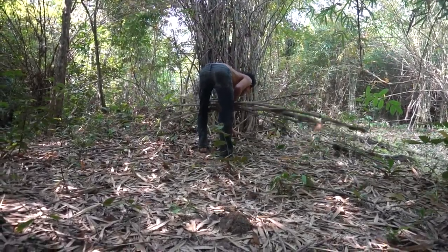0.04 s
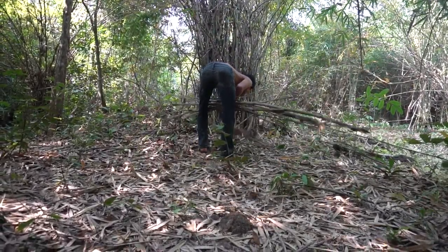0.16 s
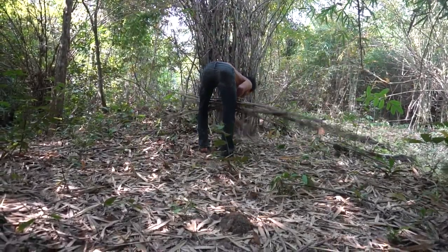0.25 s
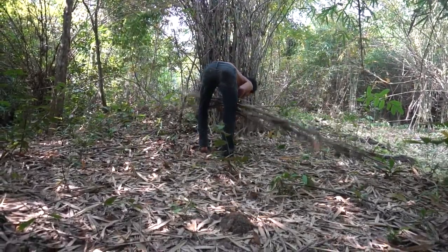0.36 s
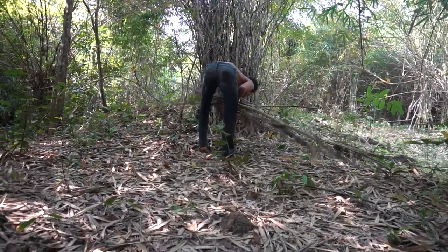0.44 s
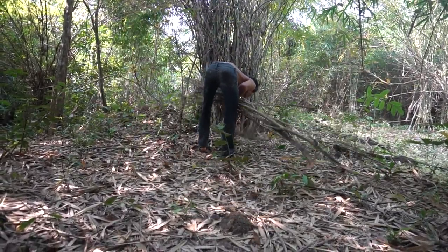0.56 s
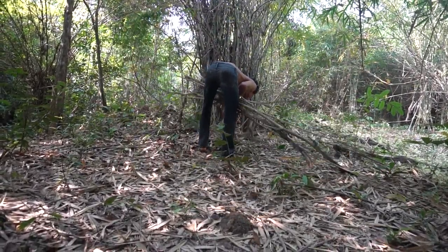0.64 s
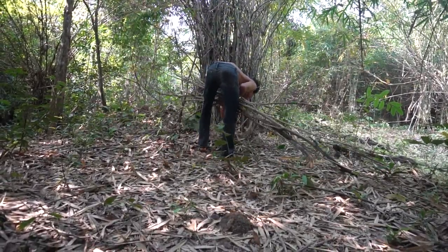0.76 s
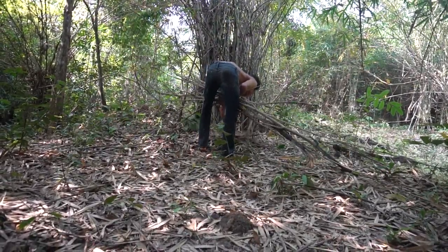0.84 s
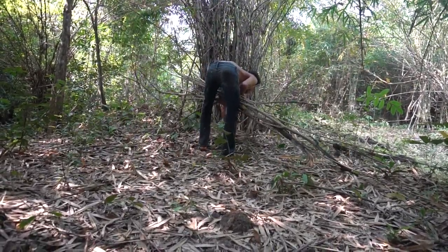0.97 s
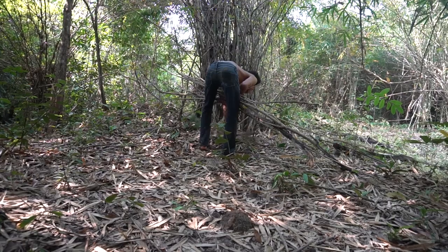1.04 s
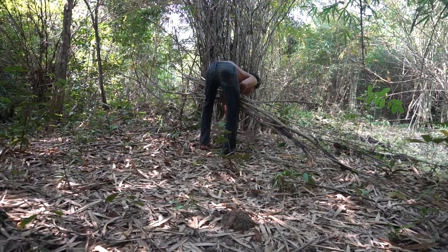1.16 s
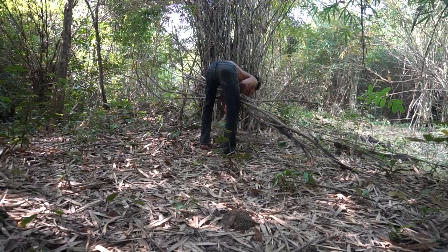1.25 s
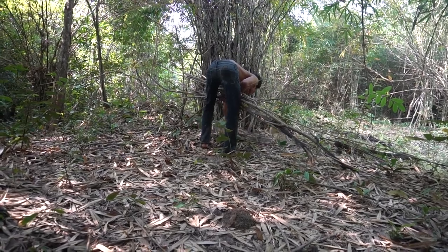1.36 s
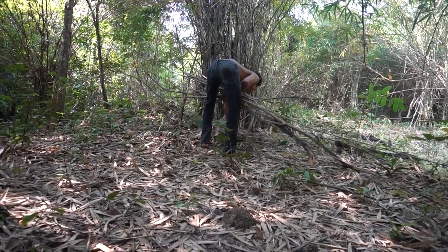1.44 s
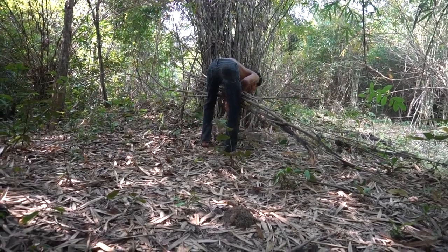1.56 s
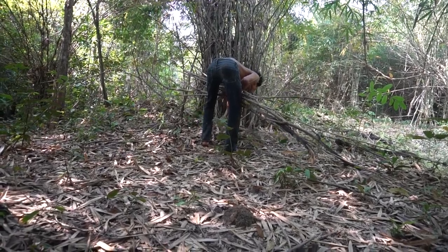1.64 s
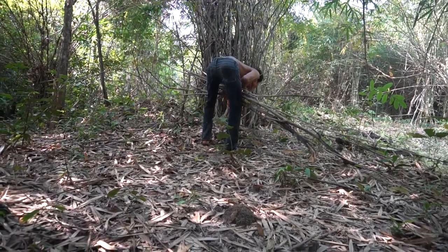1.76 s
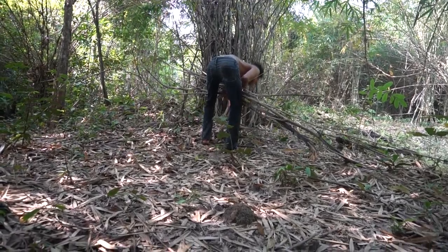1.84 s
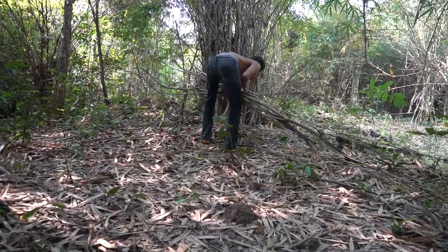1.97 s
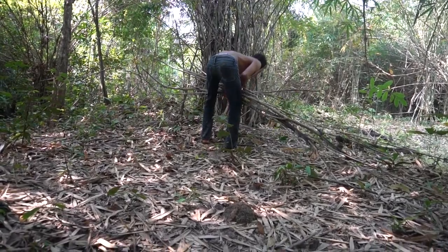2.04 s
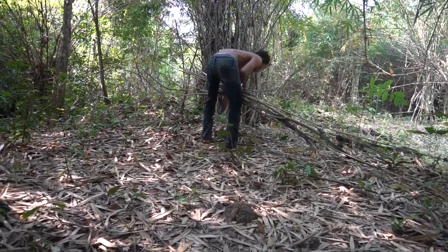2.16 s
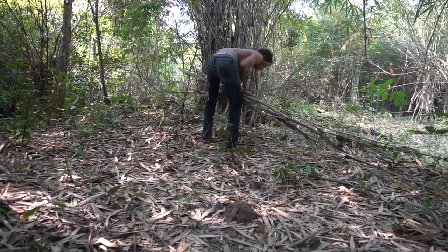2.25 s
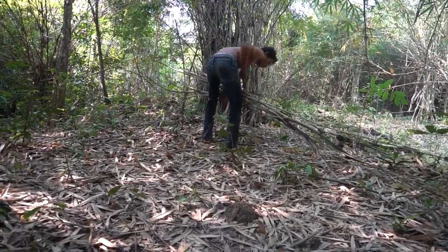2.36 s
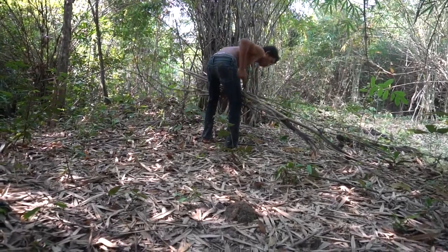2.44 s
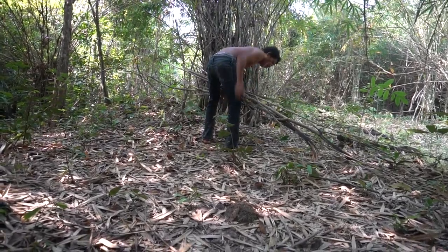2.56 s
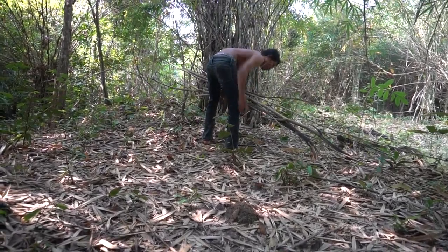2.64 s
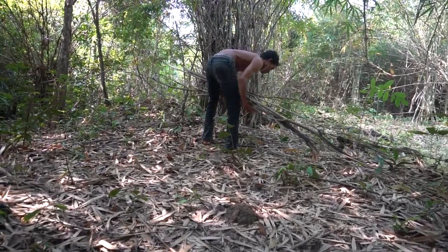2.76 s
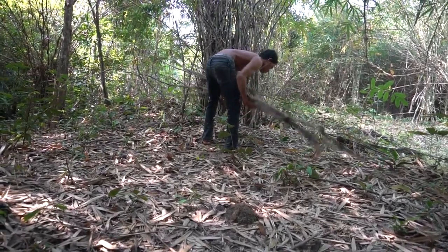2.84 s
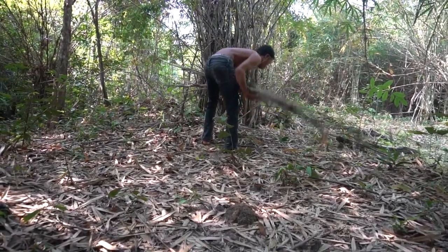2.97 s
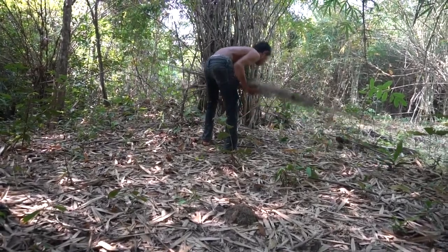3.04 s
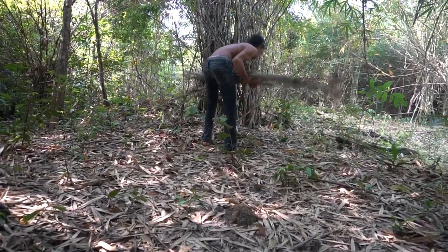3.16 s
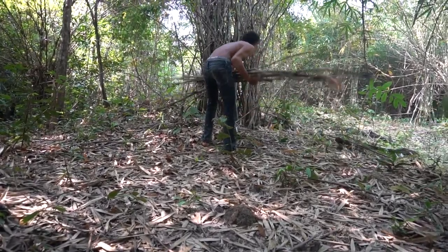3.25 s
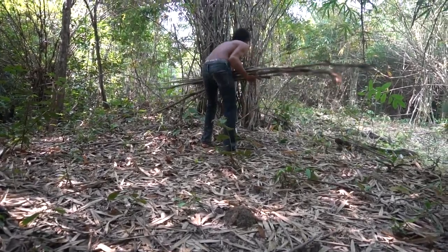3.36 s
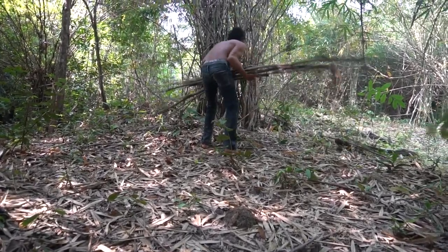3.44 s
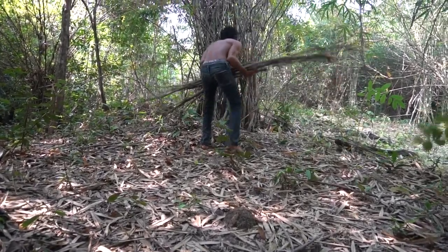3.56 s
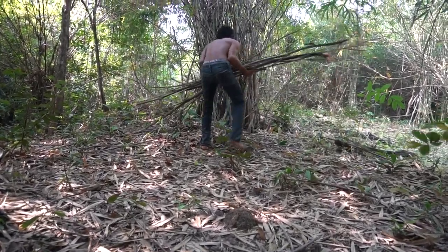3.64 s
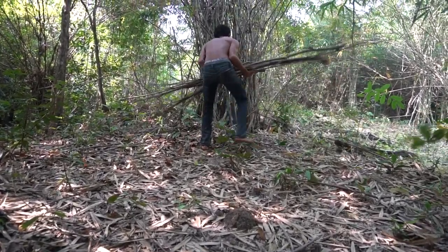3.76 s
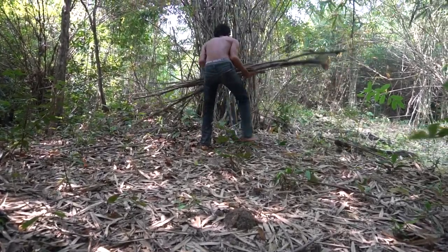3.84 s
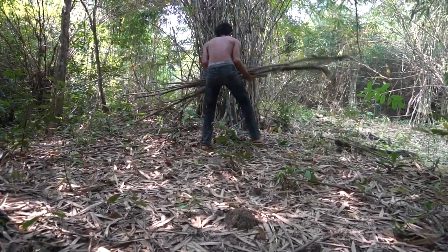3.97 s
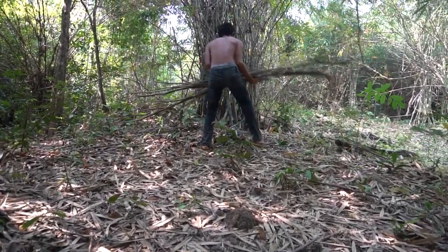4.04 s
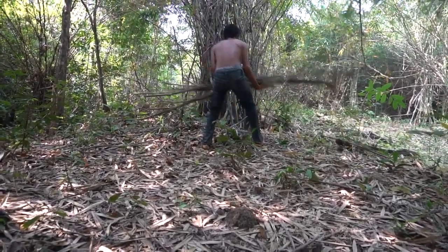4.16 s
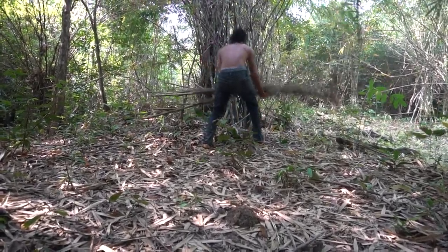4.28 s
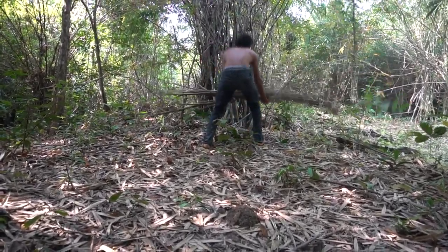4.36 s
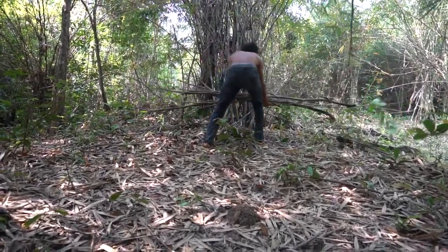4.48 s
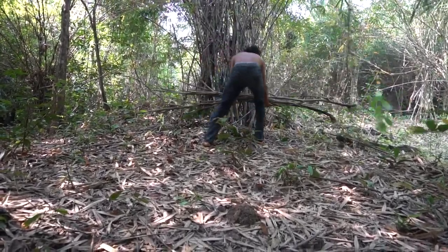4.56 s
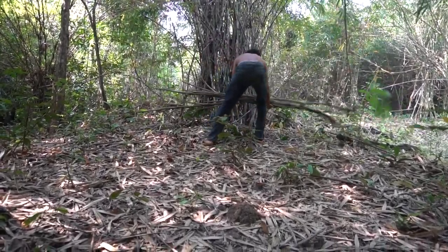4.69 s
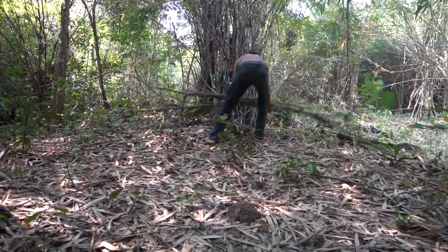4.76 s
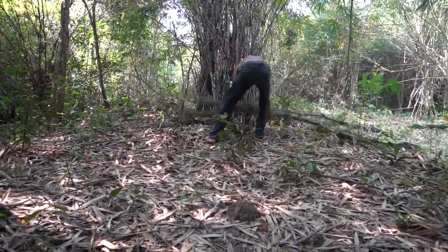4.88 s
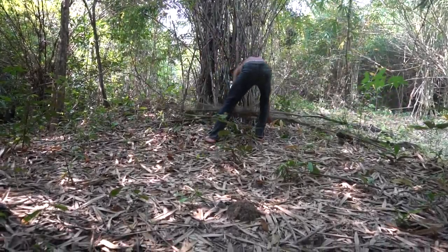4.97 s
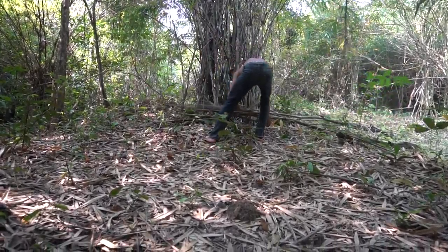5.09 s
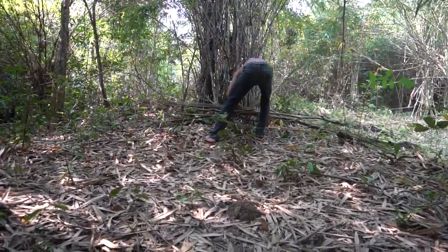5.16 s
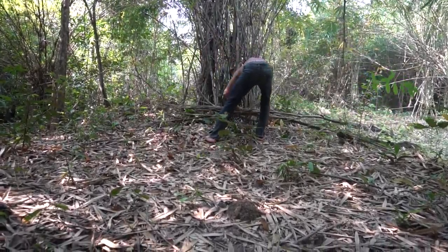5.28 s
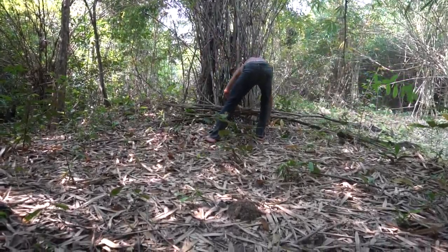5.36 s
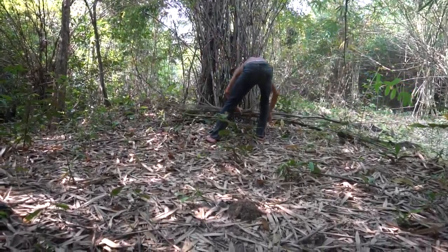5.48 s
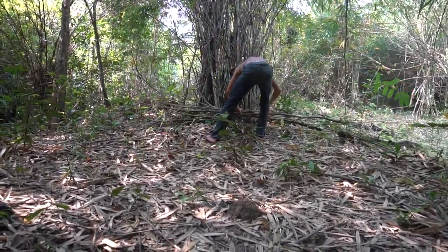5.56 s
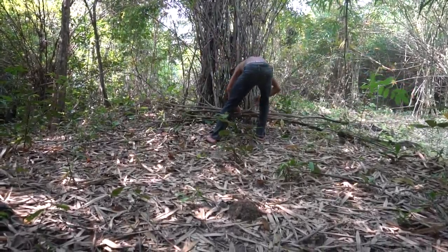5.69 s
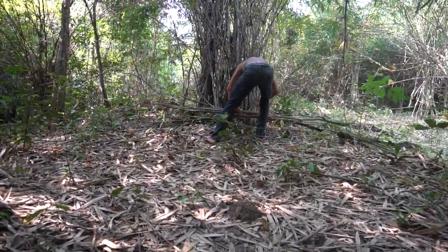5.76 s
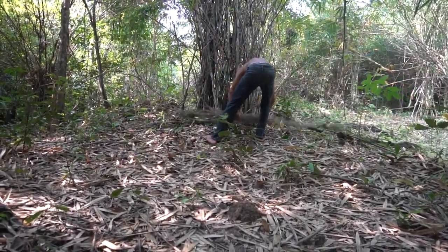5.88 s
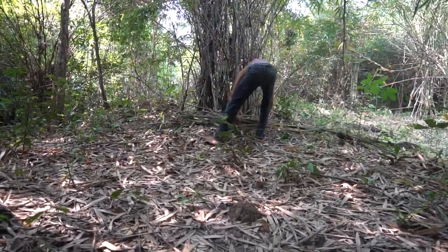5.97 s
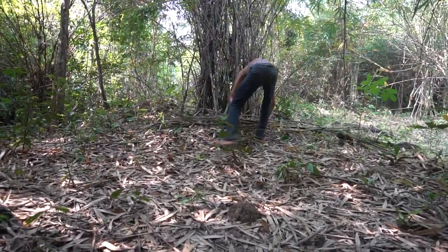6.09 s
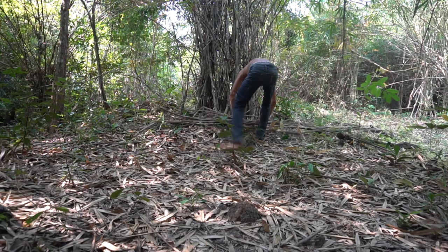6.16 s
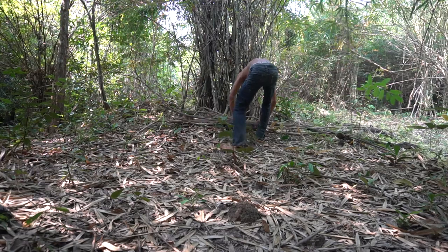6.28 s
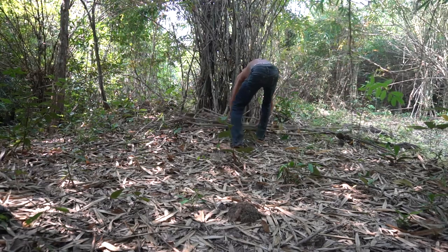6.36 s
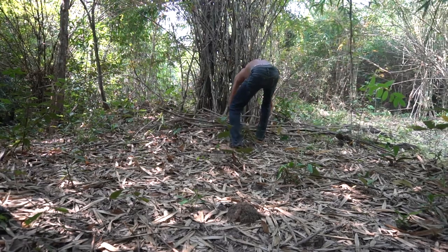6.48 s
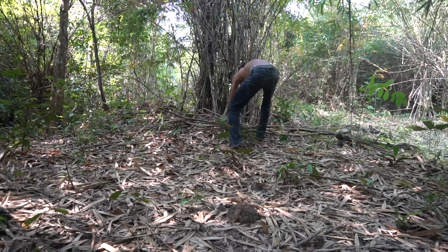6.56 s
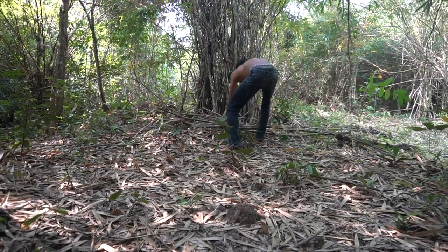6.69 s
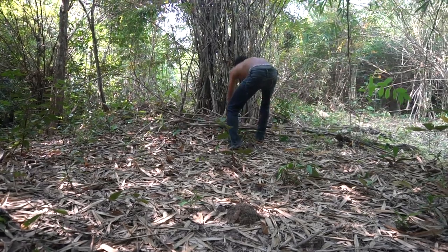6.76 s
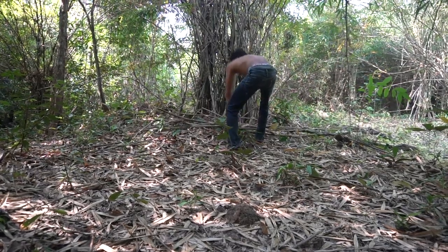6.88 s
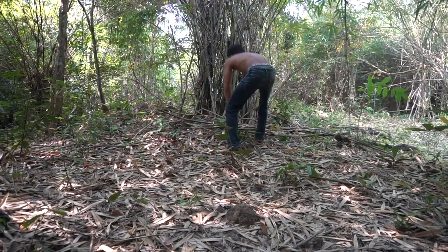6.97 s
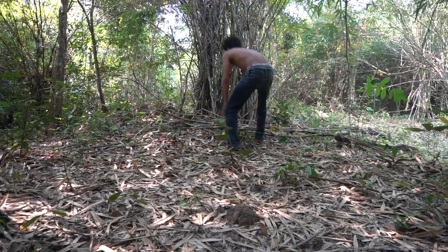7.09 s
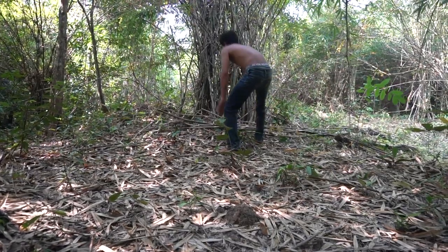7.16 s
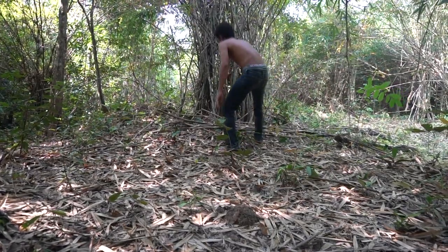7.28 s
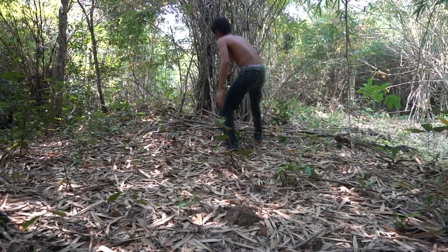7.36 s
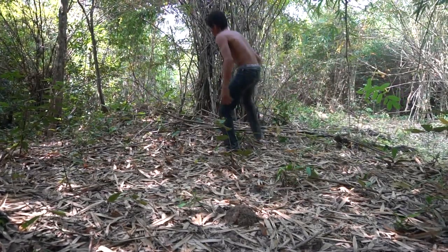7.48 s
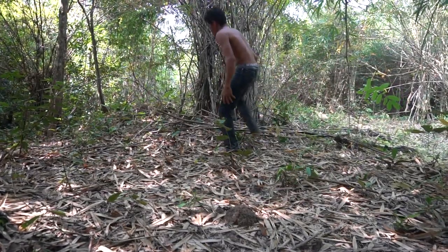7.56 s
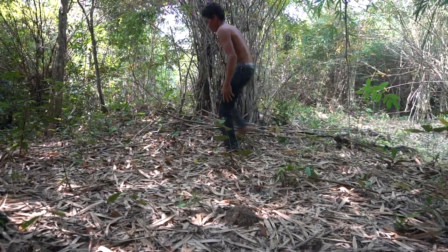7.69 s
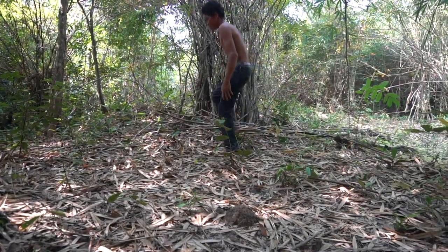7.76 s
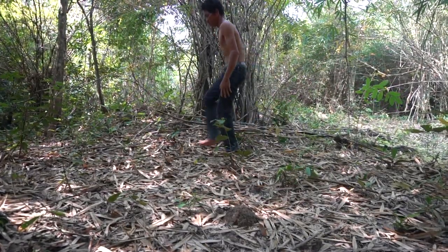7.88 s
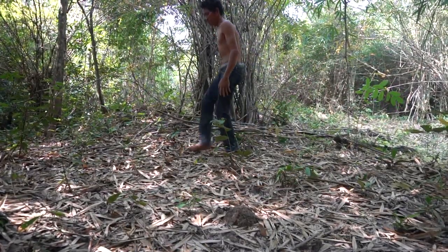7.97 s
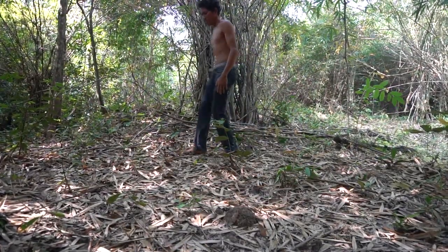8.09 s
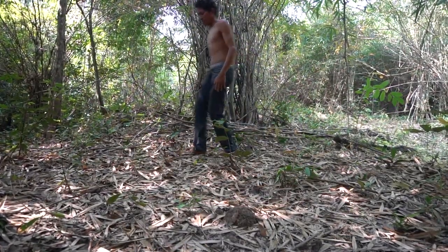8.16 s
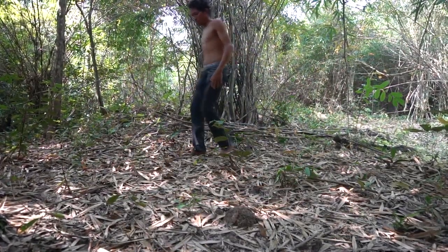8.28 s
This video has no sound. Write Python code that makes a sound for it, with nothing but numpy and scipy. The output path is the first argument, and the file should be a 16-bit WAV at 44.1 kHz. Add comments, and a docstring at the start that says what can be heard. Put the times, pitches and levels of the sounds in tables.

```python
"""Bamboo dragged over a forest floor

Close to the microphones, long dry bamboo stalks are dragged, lifted and laid down, and feet shift in the litter.
Leaves, stalks and litter are trains of tiny random fractures, coloured and swelling with each sweep or jolt.
Snaps are noise bursts with a ringing band, judders are catches through a resonance, thuds are low decaying sines.
The surrounding stems scatter it all back as short and long echoes. Far off, a motor line drones, a bird whistles
three times and something hoots once, over filtered noise for the forest air."""
import sys
import numpy as np
from scipy import signal
from scipy.fft import rfft, irfft, next_fast_len
from scipy.io import wavfile
from scipy.ndimage import uniform_filter1d

SR = 44100
rng = np.random.default_rng(int(sys.argv[2]) if len(sys.argv) > 2 else 0)


def materialize(psi):
    """Save the field psi as 16-bit PCM at rate SR to the path in sys.argv[1].

    A 1-D psi becomes a single channel; in a 2-D psi each row is a channel.
    """
    bounded = np.clip(np.atleast_2d(psi).T, -1, 1)
    quanta = np.round(bounded * 32767).astype(np.int16)
    wavfile.write(sys.argv[1], SR, quanta)


N = 367353
TIME = np.arange(N) / SR

# Forest air, filter shape: [f/Hz, relative level/dB]
FOREST_SHAPE = [(20, -20), (55, -6), (95, -4), (125, -4), (190, -8), (320, -12.5), (600, -12.5),
                (1200, -22.5), (3000, -22.5), (9000, -29), (16000, -31)]
# Likeness of left and right for sound from all round: [f/Hz, correlation]
CHANNEL_LIKENESS = [(100, 0.99), (500, 0.25), (1000, 0.19), (2000, 0.49), (4000, 0.13), (12000, 0.24)]
# Distant motor, course of its level: [t/s, relative level/dB]
MOTOR_LEVEL = [(0, -82), (0.35, -58), (0.8, -51), (1.3, -55.5), (2.2, -59), (3.0, -68), (3.9, -54.5),
               (4.5, -63.5), (5.0, -55), (5.5, -54.5), (6.0, -56), (6.4, -50.5), (6.9, -49.5), (7.2, -53),
               (7.5, -65), (7.75, -62), (8.05, -48), (8.33, -45.5)]
# One whistle of the bird: [t after its start/s, f/Hz, relative level/dB]
WHISTLE_CONTOUR = [(0, 3100, -16), (.04, 3200, -10.5), (.09, 3300, -10), (.125, 3620, -8), (.165, 4020, -5),
                   (.215, 3670, 0.5), (.265, 3770, -12), (.31, 3660, -24)]
# When the bird whistles: [t/s, relative level/dB]
WHISTLE_STARTS = [(1.75, -50), (7.06, -46.5), (7.94, -47)]
# Stalks land on the ground: [t/s, relative level/dB, f/Hz, decay/s]
GROUND_THUDS = [(2.775, -43, 330, .003), (4.974, -23.5, 207, 0.0043), (4.994, -32.5, 185, 0.0066),
                (5.481, -34.5, 365, 0.0028)]
# Filter shapes of dead-leaf litter, stalks, leaves and broad cracks: [f/Hz, relative level/dB]
LITTER_SHAPE = [(40, -26), (90, -1), (200, 2.5), (320, 2.5), (490, 0), (700, 0), (1200, 3), (1700, -8.5),
                (3000, -9.5)]
STALK_SHAPE = [(600, -23.5), (1450, -6), (2000, -1), (2500, -1.5), (3200, 0.5), (4700, -0.5), (6500, -4),
               (11000, -41)]
LEAF_SHAPE = [(900, -38), (2000, -13), (4000, -3.5), (5500, -1), (9000, 1.5), (12000, 0), (15500, -3.5)]
CRACK_SHAPE = [(150, -10), (900, -11), (2200, 1), (5000, 9), (9000, -2), (16000, -2.5)]
# Stalks judder against each other: [t/s, relative length/s, relative level/dB, f/Hz]
STALK_JUDDERS = [(0.247, 0.056, -29.5, 8800), (3.249, 0.025, -33.5, 1140), (3.273, 0.16, -40, 1240),
                 (3.468, 0.016, -33, 724), (3.548, 0.035, -33.5, 690), (3.698, 0.02, -38, 720),
                 (6.414, 0.023, -38.5, 870)]
# Twigs and stalks snap or knock:
# [t/s, relative level/dB, f/Hz, relative length/s, share of broad crack 0-1, left minus right/dB]
TWIG_SNAPS = [(0.165, -29, 3470, .0021, .4, .5), (0.192, -22.5, 11000, .0015, 0.8, 0),
              (0.235, -23.5, 2530, 0.0062, .2, -1), (0.255, -21, 9000, .0013, .2, 0),
              (0.326, -27.5, 1650, .003, .3, 0), (0.531, -19.5, 8240, .0018, .6, 0),
              (0.62, -20, 5000, .001, .95, 0), (0.747, -23, 3060, 0.0011, 0.6, -7),
              (0.776, -22.5, 3260, .0033, 0.8, 1), (0.877, -14, 5050, .0013, 0.7, 3),
              (1.3757, -12, 2830, 0.0014, 0.9, -.5), (1.3807, -19, 4660, 0.0015, 0.7, 0),
              (2.105, -30, 1500, .001, .92, 0), (2.268, -29.5, 1880, .0027, 0.3, 0),
              (2.356, -29.5, 1940, .0037, 0.77, 0), (2.472, -32.5, 2090, 0.0021, 0.3, 1),
              (2.77, -33, 1780, 0.0043, .15, -1), (2.776, -36, 1010, .003, .05, -1),
              (3.227, -22, 3060, .0009, .5, -11), (3.178, -22, 2370, .0013, .64, -8.5),
              (3.251, -20.5, 1230, 0.0022, 0.1, -2), (3.261, -23, 1200, .0018, .4, -4),
              (3.446, -14, 3000, .0007, .4, -15), (3.449, -16, 2650, .0007, 0.3, -10),
              (3.6045, -9.5, 3580, .001, .35, -2), (3.6194, -14, 3060, 0.00071, .2, -3),
              (3.658, -15, 3060, .0014, 0.5, -6), (3.7635, -8.5, 5240, .0009, .1, -5),
              (3.845, -20.5, 4660, .0015, .1, -1), (3.861, -22, 4720, 0.0016, .05, -7),
              (4.0005, -24, 3080, .0036, .75, -4), (4.1725, -18, 7770, .0008, .7, -2.5),
              (4.31, -12.5, 3360, .0017, 0.35, -4), (4.3845, -16, 3300, .001, 0.83, -7),
              (4.455, -16.5, 7940, .001, .1, -3), (4.565, -21.5, 3250, 0.0051, 0.66, -5),
              (4.764, -19.5, 3300, .0016, 0.6, -5), (4.8633, -26.5, 3250, .0027, .8, -3.5),
              (4.914, -18, 2840, 0.00089, 0.84, -6), (4.938, -17, 3050, .0009, .1, 1),
              (5.007, -18.5, 4010, 0.0015, 0.9, -1), (5.087, -21, 2950, .0007, 0.5, -6),
              (5.2051, -17, 12400, 0.0013, 0.54, -5.5), (5.301, -23.5, 4840, .0013, .4, 5),
              (5.4366, -24.5, 2340, .0018, 0, -1), (5.4803, -21.5, 1970, 0.0032, 0.08, -1),
              (5.4809, -22, 3020, 0.0035, 0.1, -1), (5.9745, -16, 7750, .0005, .7, -2),
              (6.072, -14.5, 6310, .0006, 0.5, 1), (6.0818, -18, 5500, .0013, .9, 0),
              (6.305, -11, 2870, 0.00064, 0.65, -1), (6.3926, -21.5, 2300, .00069, .36, -2),
              (6.426, -24, 3060, 0.002, .95, 3), (6.669, -36, 2650, 0.0045, .75, -1),
              (6.8183, -32, 5430, .00056, 0.5, 1), (7.578, -50, 1640, .005, .15, 0),
              (7.7749, -46, 3200, 0.0034, 0.9, 0)]
# Where the stalks touch; each layer scales the offset: [t/s, relative left minus right/dB]
CONTACT_PLACE = [(0.0, 0), (2.48, 0), (3.25, -3), (4.87, 0), (8.33, 0.5)]
# Stirring of the bundle between sweeps: [t/s, relative leaf level/dB]
STIR_LEVEL = [(0, -41.5), (1.0, -57), (1.85, -53.5), (2.55, -58.5), (3.1, -48), (4.05, -41.5), (5.0, -42),
              (5.4, -57.5), (6.85, -53), (7.3, -65), (7.65, -63.5), (7.95, -72), (8.33, -57.5)]
# Sweeps of a stalk or foot through the leaves:
# [peak t/s, relative leaf, stalk and litter level/dB (three columns), swell/s, fade/s]
LEAF_SWEEPS = [(0.252, -26.5, -32.5, -41.5, 0.063, 0.033), (0.327, -32, -31, -43.5, 0.024, 0.11),
               (0.64, -24.5, -26, -38.5, 0.064, 0.039), (0.845, -31, -36.5, -43.5, 0.17, 0.14),
               (1.081, -33, -35.5, -45.5, 0.035, 0.13), (1.207, -28.5, -32.5, -41.5, 0.056, 0.022),
               (1.444, -29.0, -32, -41.0, 0.16, 0.049), (1.621, -32.0, -35.5, -44.5, 0.087, 0.097),
               (1.953, -45.0, -47.5, -61, 0.061, 0.077), (2.315, -41.5, -40, -51.5, 0.07, 0.102),
               (2.636, -45.5, -58, -63.5, 0.022, 0.049), (2.863, -42.5, -43.5, -52.0, 0.088, 0.629),
               (3.267, -36.5, -30, -39, 0.12, 0.148), (3.487, -33.0, -25, -35, 0.052, 0.011),
               (3.881, -41.0, -38.5, -51, 0.17, 0.035), (4.175, -32.0, -37, -50, 0.013, 0.066),
               (4.386, -34, -31.0, -48.5, 0.09, 0.122), (4.578, -38, -35, -48.0, 0.025, 0.064),
               (4.772, -58, -43, -54, 0.026, 0.32), (5.181, -41, -41, -53, 0.036, 0.096),
               (5.534, -40, -36.5, -47.5, 0.094, 0.056), (5.67, -46.5, -49.5, -58, 0.034, 0.059),
               (5.974, -30, -33.5, -45.5, 0.07, 0.066), (6.201, -34, -34.5, -44.0, 0.15, 0.1),
               (6.429, -29.0, -29.5, -38, 0.032, 0.024), (6.58, -45.5, -43, -57.0, 0.155, 0.042),
               (6.728, -46, -44.5, -58, 0.053, 0.089), (6.993, -36.5, -41.5, -50.5, 0.024, 0.026),
               (7.287, -53, -54, -68, 0.53, 0.091), (7.495, -52.5, -55, -61, 0.053, 0.064),
               (8.045, -42.5, -52, -57.5, 0.023, 0.077), (8.142, -56.5, -48, -59, 0.086, 0.051)]
# Jolts, when a caught stalk springs free or lands:
# [t/s, relative leaf, stalk and litter level/dB (three columns), settling/s]
STALK_JOLTS = [(0.745, -29, -32.5, -42.5, .075), (2.265, -39, -39, -50, .03), (3.027, -33, -32, -44, .019),
               (3.5465, -28, -25.5, -38.5, .13), (4.171, -36, -39, -52, .03),
               (4.489, -34.5, -32, -50.5, .035), (4.9155, -30, -30, -41.5, .13),
               (5.006, -29, -36, -52, .032), (5.203, -32.5, -38.5, -57, .014),
               (5.301, -33.5, -37, -54.5, .026), (6.0805, -23, -28, -38.5, .025),
               (6.304, -31.5, -33, -55, .019)]

JOLT_ATTACK_S = .0015
STIR_STALK_DB, STIR_LITTER_DB = 0.4, -12  # beside the leaf level of the stirring
# Lesser twigs: rate, base level above the scrape, scatter, middle pitch and relative length
TWIGS_PER_S, TWIG_DB, TWIG_SPREAD_DB, TWIG_HZ, TWIG_S = 9, 5, 1.8, 3300, .0009
PORT_LAG_S_PER_DB = 8e-6  # delay at the farther microphone port
TOP_HZ = 15950


def undb(db):
    """Decibels to gain."""
    return 10 ** (np.asarray(db) / 20)


def curves(table):
    """The columns of a timed table, joined by straight lines."""
    s, *columns = np.transpose(table)
    return [np.interp(TIME, s, c) for c in columns]


def unit(x):
    """Scale a stereo pair so that its middle has rms 1."""
    return x / np.sqrt(np.mean(x.mean(0) ** 2))


def pan(db):
    """Left and right gains, of mean 1, for a level difference."""
    gains = undb(np.array([db, -db]).reshape(2, -1) / 2)
    return gains / gains.mean(0)


def on_bins(points, size):
    """Read (Hz, value) points at the bins of a transform, along log frequency."""
    hz, value = np.transpose(points)
    bin_hz = np.arange(size // 2 + 1) * SR / size
    return np.interp(np.log(bin_hz + 1), np.log(hz), value)


def convolve(x, response):
    """Pass sound through a response, channel by channel."""
    return signal.fftconvolve(np.atleast_2d(x), np.atleast_2d(response), axes=1)[:, :N]


def colour(x, spectrum, size=2048):
    """Causal minimum-phase filter with the given spectrum and unit energy."""
    cepstrum = irfft(np.log(undb(on_bins(spectrum, size))))
    # fold the cepstrum forward in time
    cepstrum[1:size // 2] *= 2
    cepstrum[size // 2 + 1:] = 0
    response = irfft(np.exp(rfft(cepstrum)))
    return convolve(x, response / np.linalg.norm(response))


def diffuse(pair):
    """Make two unrelated channels alike in the bass, as close microphones hear them."""
    size = next_fast_len(pair.shape[1])
    alike = np.clip(on_bins(CHANNEL_LIKENESS, size), 0, 1)
    mid, side = rfft(pair, size) * np.sqrt([1 + alike, 1 - alike]) / np.sqrt(2)
    return irfft(np.array([mid + side, mid - side]), size)[:, :pair.shape[1]]


def walk(rate):
    """Smooth random wandering with a spread of 1."""
    k = max(int(SR / rate), 1)
    steps = np.repeat(rng.standard_normal(N // k + 1), k)
    y = uniform_filter1d(uniform_filter1d(steps, k), k)[:N]
    return y / y.std()


def scatter(x, t60, gap):
    """Echoes from many stems: they build up over the gap and die away."""
    t = TIME[:SR]
    build_up = 1 - np.exp(-(t / gap) ** 2)
    response = diffuse(rng.standard_normal((2, SR))) * undb(-60 * t / t60) * build_up
    return convolve(x.mean(0), response / np.linalg.norm(response[0]))


def flurries(rate, decay, depth, spread_db):
    """One fracture sets off its neighbours: activity jumps and dies away. Gain with rms 1."""
    strength = undb(-spread_db * np.log(rng.random(N) + 0.055)) ** 2
    triggers = (rng.random(N) < rate / SR) * strength
    activity = signal.lfilter([1], [1, -np.exp(-1 / (decay * SR))], triggers)
    return np.sqrt(1 - depth + depth * activity / activity.mean())


def crackle(rate, spread_db, width_db, lag, count=150000):
    """Tiny fractures, most weak and a few strong if spread, each with its own level difference and lag."""
    chance = rng.random((count, 5))[:int(min(rate * N / SR, count))]
    when, strength, sign, side, angle = chance.T
    size = np.sign(sign - .5) * undb(-spread_db * np.log(strength + 0.013))
    gains = pan(width_db * (2 * side - 1))
    left = (when * (N - 1)).astype(int)
    shift = np.round(lag * (2 * angle - 1)).astype(int)  # samples between the ports
    right = np.clip(left + shift, 0, N - 1)
    return np.array([np.bincount(at, size * g, N) for at, g in zip((left, right), gains)])


def ringing(low_hz, high_hz, cycles, rate, spread_db, width_db, lag, size=320, count=12000):
    """Fractures in pieces of many sizes, each ringing for a few cycles at its own pitch."""
    chance = rng.random((count, 4))[:int(min(rate * N / SR, count))]
    when, strength, piece, side = chance.T[:, :, None]
    hz = low_hz * (high_hz / low_hz) ** piece
    side = 2 * side - 1
    places = (when * (N - size)).astype(int) + np.arange(size)
    out = []
    for port in (1, -1):  # left, right
        samples = np.maximum(np.arange(size) - 2 + port * side * lag / 2, 0)
        turns = hz * samples / SR
        loudness = undb(-spread_db * np.log(strength + 0.0028) + port * side * width_db / 2)
        grains = loudness * np.exp(-turns / cycles) * np.sin(2 * np.pi * turns)
        out.append(np.bincount(places.ravel(), grains.ravel(), N))
    return unit(np.array(out))


def from_side(pair, place_db):
    """Sound from one side reaches the far port a little later."""
    lag = PORT_LAG_S_PER_DB * place_db * SR
    late = np.round([np.maximum(-lag, 0), np.maximum(lag, 0)]).astype(int)
    return np.take_along_axis(pair, np.maximum(np.arange(N) - late, 0), axis=1)


def forest():
    """Low distant rumble and a thin hiss of foliage: filtered noise from all round."""
    air = colour(diffuse(rng.standard_normal((2, N))), FOREST_SHAPE)
    return unit(air) * undb(-56.5 + 0.23 * walk(1.26))


def motor(hz=140.0):
    """A far motor, of which one low, slightly unsteady line carries through the trees."""
    db, = curves(MOTOR_LEVEL)
    phase = 2 * np.pi * np.cumsum(hz * (1 + 0.0029 * walk(4.88))) / SR
    fading_db = .9 * walk(5)
    return np.sqrt(2) * np.sin(phase) * undb(db - 1.0 + fading_db)


def hoot(s=8.26, length=0.066, hz=365, db=-55):
    """A faint, soft hoot far away: a wavering sine under a bell-shaped swell."""
    phase = 2 * np.pi * np.cumsum(hz * (1 + 0.0205 * walk(40))) / SR
    return undb(db) * np.exp(-((TIME - s) / length) ** 2) * np.sin(phase)


def bird():
    """A wavering whistle that climbs and then dips, smeared by the trees."""
    song = np.zeros(N)
    for start, db in WHISTLE_STARTS:
        hz, shape_db = curves(np.array(WHISTLE_CONTOUR) + [start, 0, 0])
        sounding = (TIME > start) & (TIME < start + WHISTLE_CONTOUR[-1][0])
        waver = 1 + .018 * walk(220)
        song += sounding * undb(db + shape_db) * np.sin(2 * np.pi * np.cumsum(hz * waver) / SR)
    return undb(-2) * song + undb(3) * scatter(song[None], t60=.45, gap=.008)


def thuds():
    """Soft ground takes the weight of the stalks: a few low cycles."""
    out = np.zeros(N)
    for s, db, hz, decay in GROUND_THUDS:
        t = np.maximum(TIME - s, 0)
        envelope = 2 * t / decay * np.exp(-t / decay)
        out += undb(db) * envelope * np.sin(2 * np.pi * hz * t)
    return out


def litter(db):
    """The deep layer of dead leaves gives way with a dull crunch of many fractures."""
    crunch = crackle(rate=2200, spread_db=3.8, width_db=3, lag=6)
    activity = flurries(rate=110, decay=0.0033, depth=0.4, spread_db=2.5)
    return unit(colour(crunch * activity, LITTER_SHAPE)) * undb(db + 2.0)


def leaves(db):
    """Countless papery leaves brush and crackle in small flurries as they are swept aside."""
    brushing = unit(crackle(rate=14000, spread_db=0.0, width_db=18.0, lag=.7))
    blades = ringing(2970, 13000, cycles=2.0, rate=820, spread_db=2.0, width_db=6, lag=1.6)
    activity = flurries(rate=130, decay=.001, depth=.3, spread_db=4)
    rustle = brushing * activity + undb(-9.5) * blades
    return unit(colour(rustle, LEAF_SHAPE)) * undb(db + 1.11)


def snaps(rows, size=2048):
    """A sudden break, then fibres tear in a quick burst: a broad crack, and the broken piece rings."""
    cracks, rings = np.zeros((2, 2, N + size))
    t = TIME[:size]
    for s, db, hz, length, share, pan_db in rows:
        share, at = np.clip(share, .02, .98), int(s * SR)
        fibres = rng.standard_normal(size)
        fibres[0] = 3  # a strong first break
        crack = fibres * np.exp(-t / (1.1 * length))
        band = np.minimum([hz / 1.16, hz * 1.16], .45 * SR)
        modes = signal.butter(2, band, "band", fs=SR)
        ring = signal.lfilter(*modes, fibres * np.exp(-t / (2.2 * length)))
        crack = np.sqrt(share) * crack / np.linalg.norm(crack)
        ring = np.sqrt(1 - share) * ring / np.linalg.norm(ring)
        gain = undb(db - 1.0) * np.sqrt(length * SR) * pan(pan_db)
        # a port on the clearly louder side is reached first
        lag = int(np.clip(np.round(0.28 * pan_db), -2, 2))
        for channel, start in enumerate((at, at + lag)):
            cracks[channel, start:start + size] += gain[channel] * crack
            rings[channel, start:start + size] += gain[channel] * ring
    return colour(cracks[:, :N], CRACK_SHAPE) + rings[:, :N]


def lesser_snaps(stalk_db, place_db, count=200):
    """Small twigs give way at random, louder the harder the stalks scrape; rows as in TWIG_SNAPS."""
    when, strength, piece, share = rng.random((count, 4))[:int(TWIGS_PER_S * N / SR)].T
    at = (when * (N - 1)).astype(int)
    db = stalk_db[at] + TWIG_DB - TWIG_SPREAD_DB * np.log(strength + 0.055)
    hz = TWIG_HZ * 2 ** (2 * piece - 1)  # within an octave either way
    return list(zip(TIME[at], db, hz, np.full(len(at), TWIG_S), share, 2 * place_db[at]))


def judders(place_db):
    """Stick and slip: a short run of catches drives one resonance of a hollow stalk."""
    catches = unit(crackle(rate=2500, spread_db=6.0, width_db=1, lag=3))
    out = np.zeros((2, N))
    for s, length, db, hz in STALK_JUDDERS:
        span = slice(int(s * SR), int((s + 1.64 * length) * SR))
        tone = signal.lfilter(*signal.iirpeak(hz, 6, fs=SR), catches[:, span])
        progress = np.linspace(0, 1, tone.shape[1])
        out[:, span] += unit(tone * np.sqrt(progress) * (1 - progress)) * undb(db - 4.0)
    return out * pan(1.5 * place_db)


def stalks(db):
    """Side twigs catch and slip along the stalks in short bursts, and ring briefly."""
    slips = unit(crackle(rate=9000, spread_db=2.5, width_db=4, lag=3))
    twigs = ringing(1700, 5400, cycles=4, rate=400, spread_db=3.6, width_db=4, lag=2.5)
    activity = flurries(rate=220, decay=0.0043, depth=0.52, spread_db=2.5)
    scrape = slips * activity + undb(-9.5) * twigs
    return unit(colour(scrape, STALK_SHAPE)) * undb(db - 1.9)


def handling():
    """Levels of leaves, stalks and litter in dB: sweeps swell and fade, jolts start abruptly and settle."""
    stir_db, = curves(STIR_LEVEL)
    power = undb(stir_db + np.array([[0], [STIR_STALK_DB], [STIR_LITTER_DB]])) ** 2
    jolts = [(s + JOLT_ATTACK_S, *dbs, JOLT_ATTACK_S / 2, settling) for s, *dbs, settling in STALK_JOLTS]
    for s, *dbs, swell, fade in list(LEAF_SWEEPS) + jolts:
        span = slice(max(int((s - 6 * swell) * SR), 0), int((s + 6 * fade) * SR))
        t = TIME[span] - s
        motion = np.exp(-np.maximum(-t / swell, t / fade))
        power[:, span] += np.outer(undb(dbs), motion) ** 2
    return 10 * np.log10(power)


def scene():
    """The work on the ground, its echoes off litter and stems, and the forest behind."""
    background = forest() + motor() + hoot() + bird()
    leaf_db, stalk_db, litter_db = handling()
    place_db, = curves(CONTACT_PLACE)
    rustle = litter(litter_db) * pan(0.34 * place_db)
    rustle = rustle + leaves(leaf_db) * pan(.8 * place_db)
    rustle = rustle + from_side(stalks(stalk_db), place_db) * pan(2.5 * place_db)
    # shared flurries bind the three layers
    rustle = rustle * flurries(rate=83, decay=0.0074, depth=0.1, spread_db=3.0)
    rustle = rustle + judders(place_db)
    cracks = snaps(list(TWIG_SNAPS) + lesser_snaps(stalk_db, place_db))
    # each snap shakes the leaves on its twig
    shaken = undb(-8.0) * colour(scatter(cracks, t60=0.22, gap=0.0023), LEAF_SHAPE)
    near = undb(-11) * scatter(rustle + cracks, t60=0.046, gap=0.003)
    far = undb(-15.5) * scatter(rustle + cracks, t60=0.44, gap=0.021)
    return background + thuds() + far + near + shaken + cracks + undb(0.77) * rustle


def record(dry):
    """The camera cuts the top: a steep low-pass."""
    return signal.sosfilt(signal.ellip(10, .2, 70, TOP_HZ, fs=SR, output="sos"), dry)


dry = scene()
out = record(dry)
materialize(out)
```